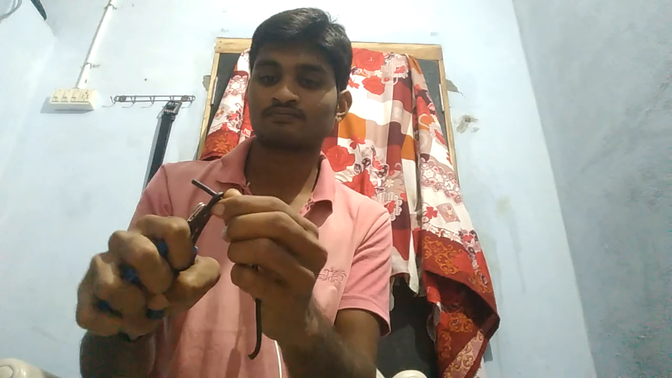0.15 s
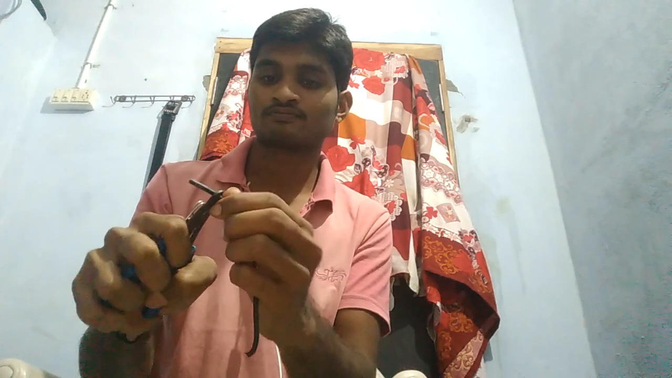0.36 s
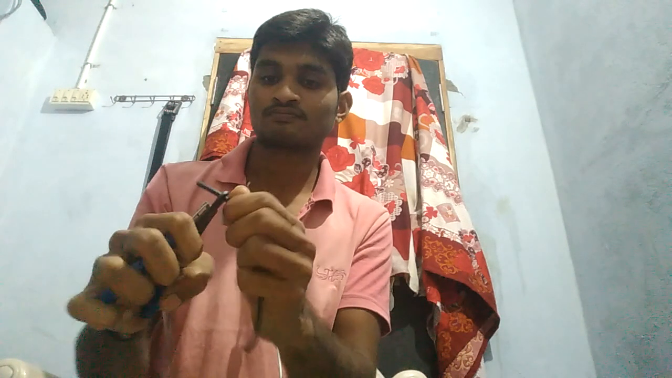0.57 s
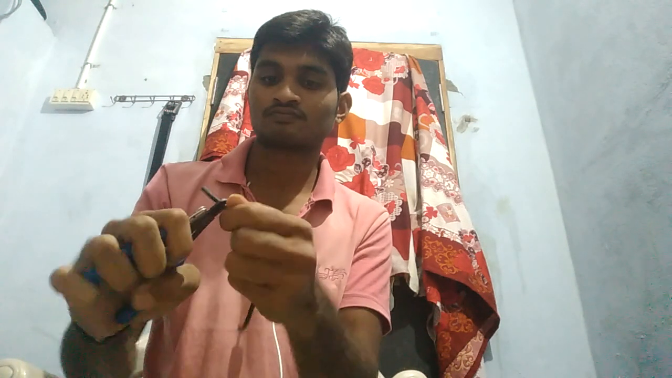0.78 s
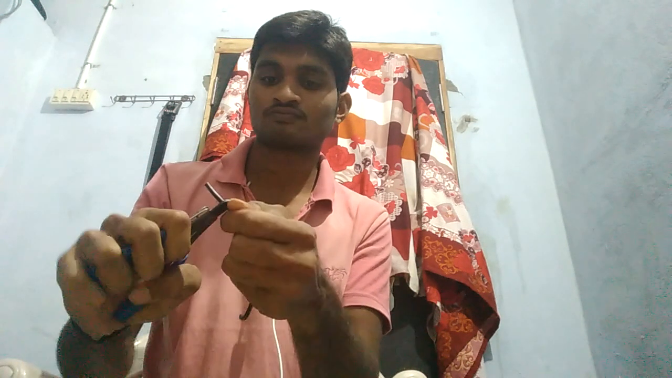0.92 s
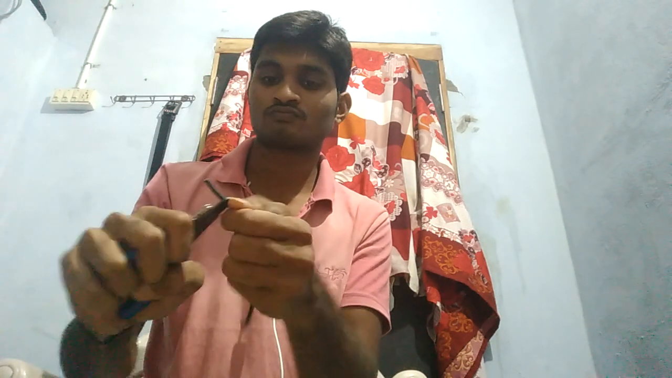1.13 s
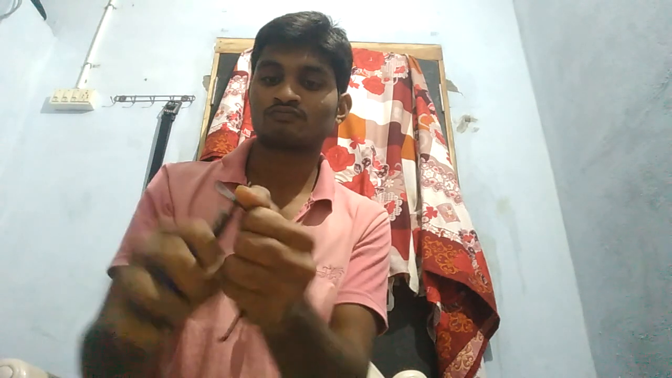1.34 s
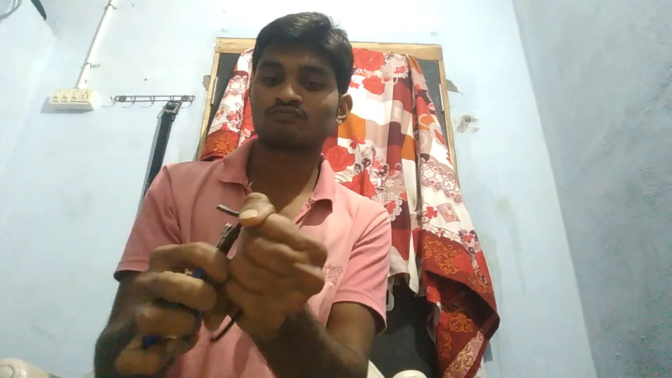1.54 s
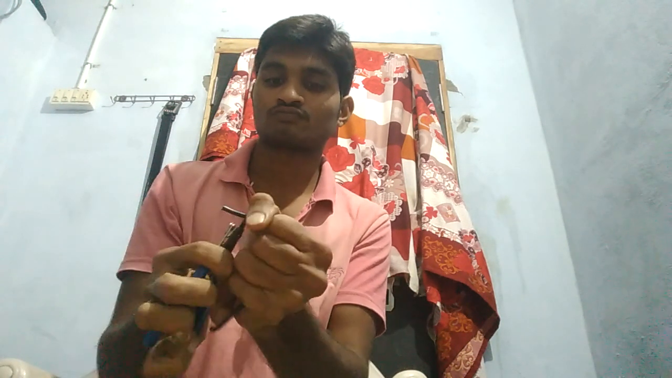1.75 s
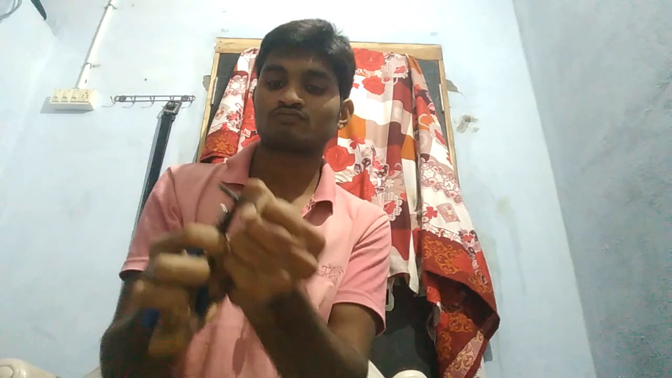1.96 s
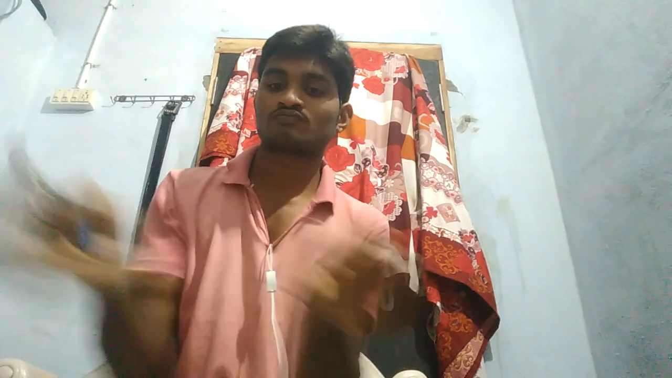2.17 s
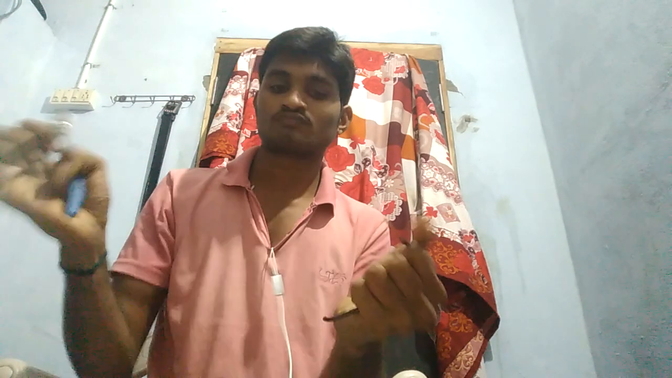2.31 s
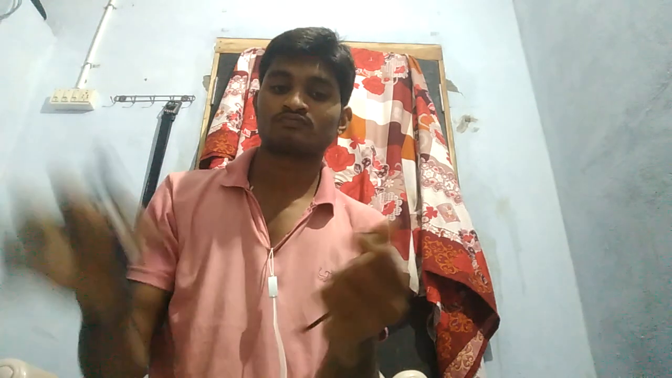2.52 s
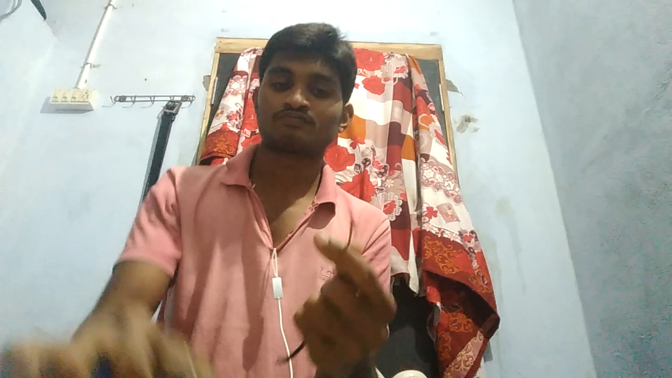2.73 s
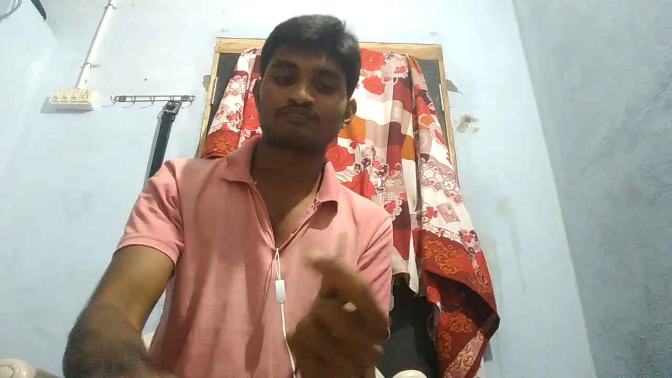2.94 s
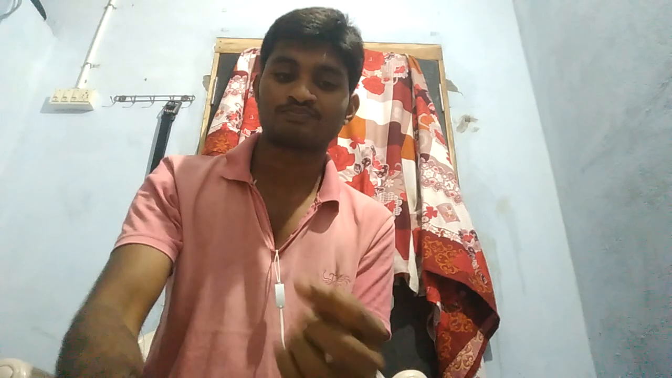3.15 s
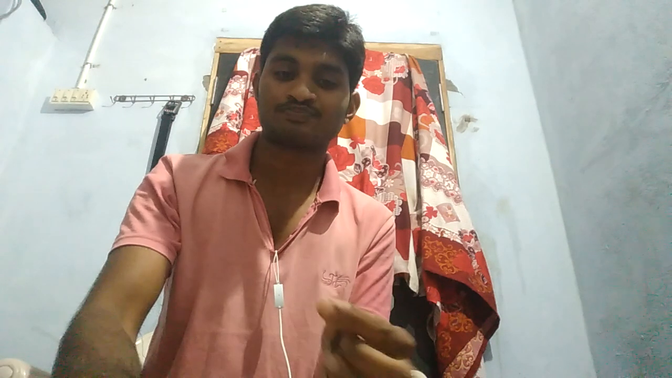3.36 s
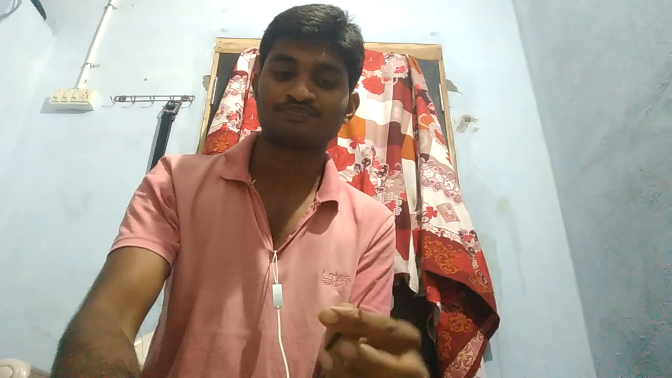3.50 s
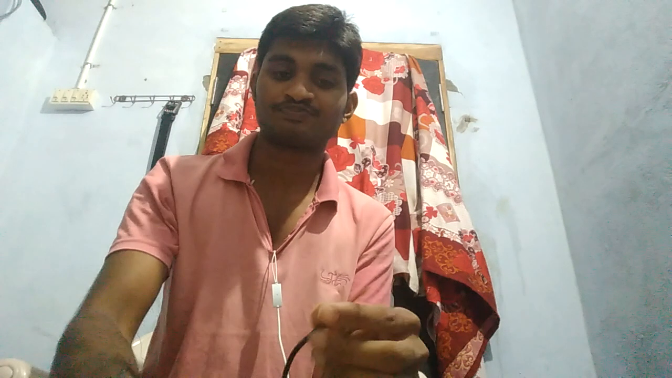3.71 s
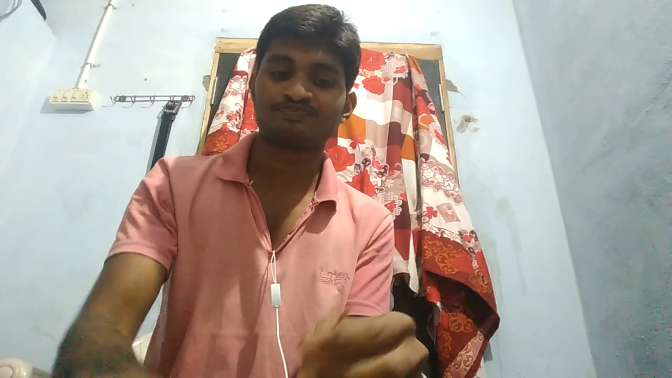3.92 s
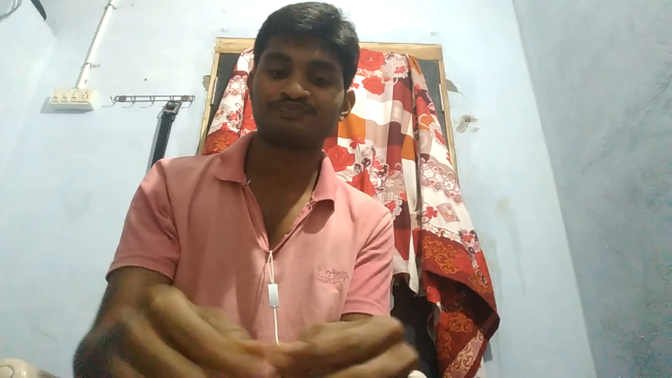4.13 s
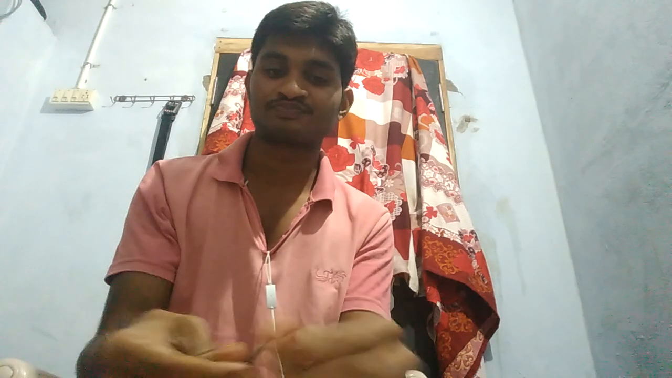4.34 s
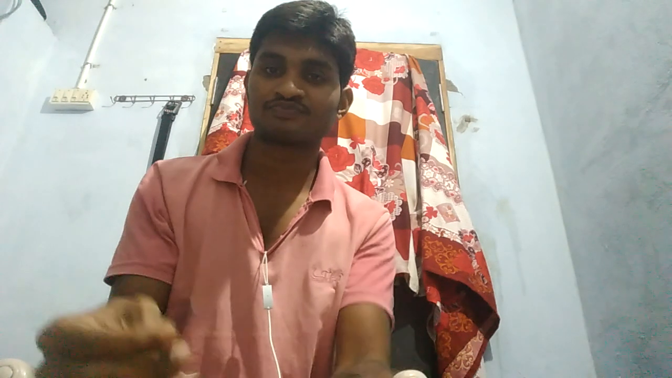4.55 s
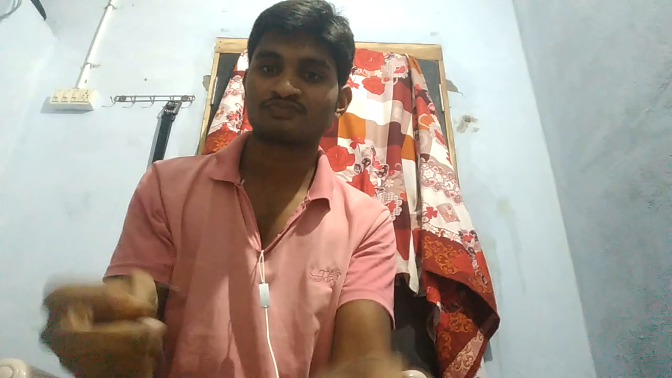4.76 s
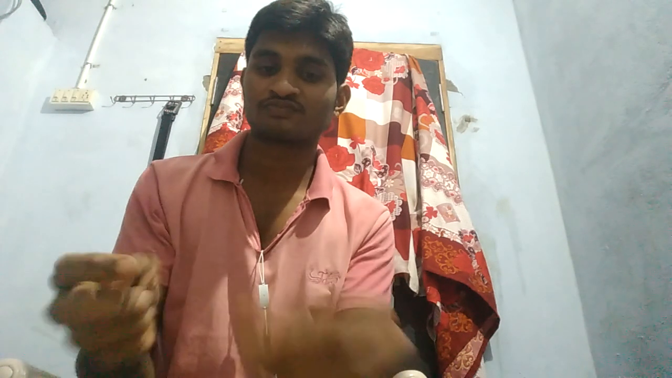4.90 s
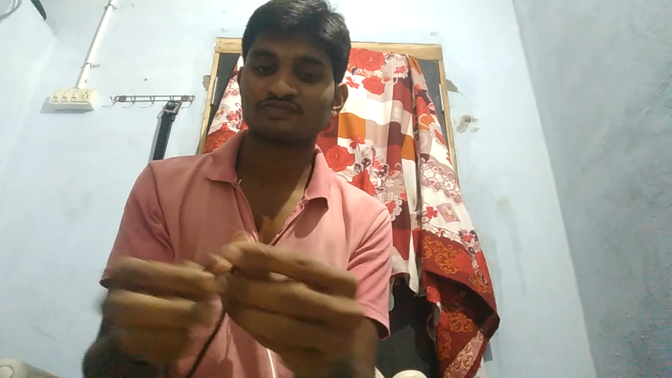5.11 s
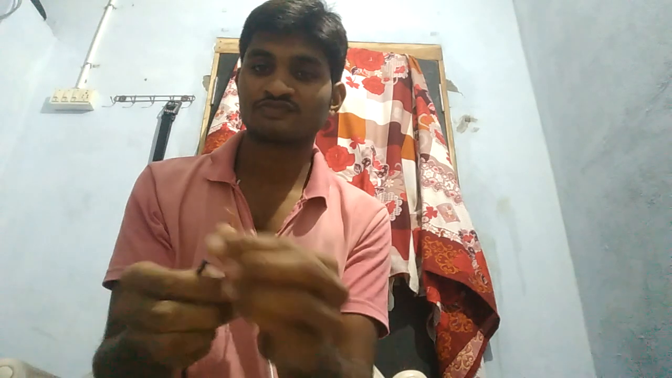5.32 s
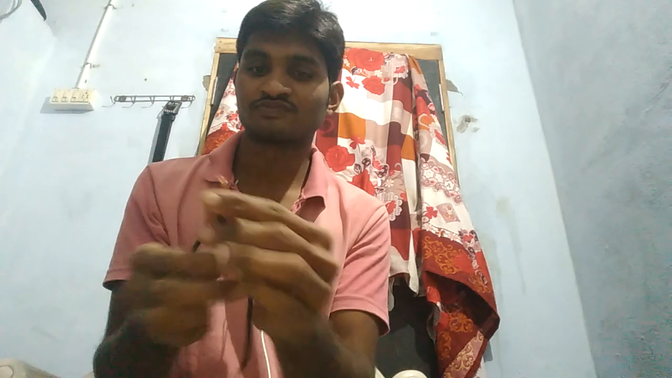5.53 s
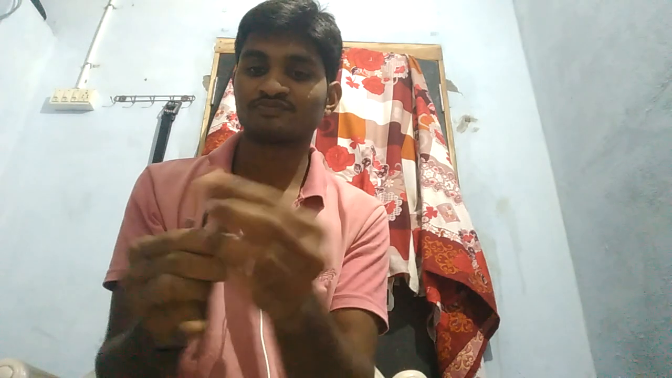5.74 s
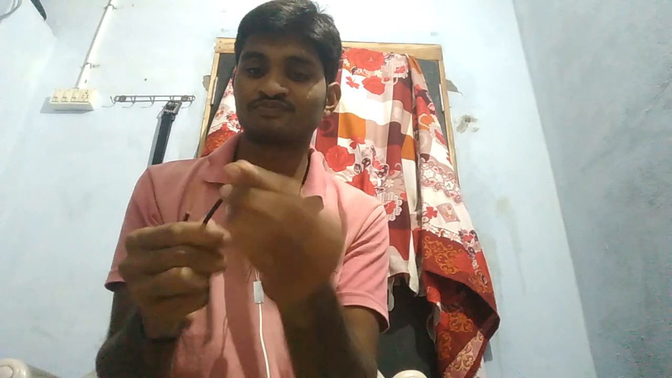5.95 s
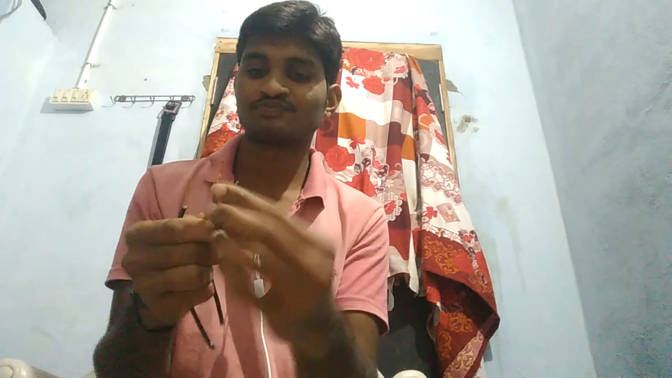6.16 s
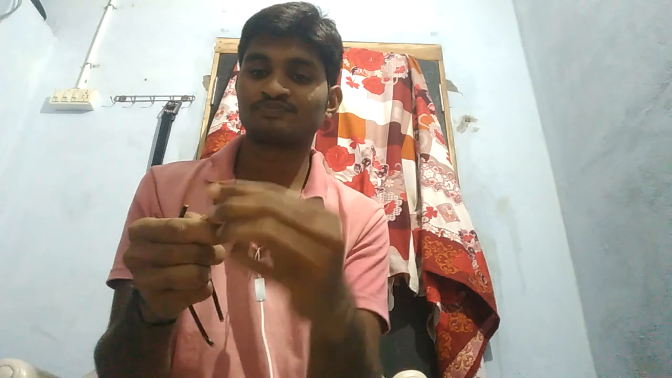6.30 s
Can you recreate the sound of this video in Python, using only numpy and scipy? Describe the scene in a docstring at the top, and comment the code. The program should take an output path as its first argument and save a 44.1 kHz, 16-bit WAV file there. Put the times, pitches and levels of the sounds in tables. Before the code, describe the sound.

Faint creaks and a small snap of wire stripping, then pliers clatter onto a tabletop and a wire scrapes off it.

```python
"""Pliers stripping a wire

Pliers nip the insulation, creaking at the pivot, and tear it off with a snap. They clack shut and
are laid on a table near the microphones, which thuds; a wire is dragged off it and fingered.
A small bare room, two spaced microphones with a treble peak and their own hiss."""
import sys
import numpy as np
from scipy import signal
from scipy.fft import rfft, irfft, next_fast_len
from scipy.io import wavfile
from scipy.ndimage import uniform_filter1d

SR = 44100
rng = np.random.default_rng(int(sys.argv[2]) if len(sys.argv) > 2 else 0)


def waveform_to_disk(signal):
    """Save audio, clipped to [-1, 1], as 16-bit WAV at the path in sys.argv[1]."""
    frames = np.transpose(np.atleast_2d(signal))
    scaled = np.clip(frames, -1, 1) * 32767
    samples = np.round(scaled).astype(np.int16)
    wavfile.write(sys.argv[1], SR, samples)


N = 285319

# noise colours of the bed: microphones, room hush, low rumble (frequency [Hz], relative level [dB])
HISS_SPECTRUM = [(1500, -13), (2900, -3.5), (4700, -3.5), (9280, -2), (15600, 3.5), (16100, -23.5)]
HUSH_SPECTRUM = [(22, 5), (80, -7.5), (128, 3), (309, 0.5), (672, -4.5), (3000, -13.5), (3900, -40.5)]
RUMBLE_SPECTRUM = [(36, -4.5), (50, 7.5), (70, -12.5), (100, -23.5)]
# the room's tail (frequency [Hz], t60 [s])
ROOM_DECAY = [(200, 0.3), (1000, 0.43), (4000, 0.18), (12000, 0.18)]
# noise colours of the handling: rustle, wire flicks, click treble (frequency [Hz], relative level [dB])
RUSTLE_SPECTRUM = [(4000, -8.5), (6000, -10.5), (8200, -3.5), (11200, 8), (15300, -14.5), (16100, -30.5)]
FLICK_SPECTRUM = [(1760, -33), (3000, -21.5), (6440, -17.5), (8000, -13.5), (11000, 5.5), (14500, -5.5),
                  (16000, -19.5)]
CLICK_SPECTRUM = [(2060, -40), (3500, -33.5), (6360, -7.5), (7880, -2.5), (9690, 5), (15200, -8.5),
                  (16500, -31)]
# what rings: table top, dragged things, steel jaws, plastic sleeve, handles
# (frequency [Hz], relative level [dB], t60 [s])
TABLE_MODES = [(161.3, -8, 0.17), (223.4, 2, 0.055), (286, -1.5, 0.05), (352.7, 0.5, 0.074),
               (406.3, -1, 0.067), (496.3, -2.5, 0.05), (674, 1, 0.018), (729, 2, 0.03), (830, 0.5, 0.024),
               (960, 3.5, 0.021), (1101, -0.5, 0.024), (1370, -11, 0.13), (1426, -23, 0.025)]
GRIT_MODES = [(1380, 2.5, 0.014), (2326, -3, .007), (2810, -4.5, 0.012), (3236, -9.5, 0.01),
              (4880, -5.5, 0.0028), (8250, 6, 0.0026)]
JAW_MODES = [(1834, -3, 0.023), (3100, -15, 0.044), (4480, -11.5, 0.032), (6270, 7.5, 0.023),
             (8880, 4.5, 0.013), (10950, 20.5, 0.0031)]
SLEEVE_MODES = [(563, 4, 0.012), (2090, 6.5, 0.0098), (2800, -17, 0.013), (4430, -5, 0.0073)]
HANDLE_MODES = [(2120, -9.5, 0.011), (4120, -6.5, 0.019), (6130, -6, 0.0074), (8300, 7.5, 0.0073),
                (11340, 6.5, 0.0036), (12000, 2, 0.0028), (14200, 0, 0.0076)]
# fader curve of fingers, cloth and wire (time [s], level [dB])
RUSTLE_CURVE = [(2.19, -58), (2.3, -56), (2.5, -61), (2.64, -59.5), (2.76, -66), (3.08, -61), (3.17, -40),
                (3.24, -51), (3.4, -59), (3.75, -53), (3.9, -49), (4.1, -60), (4.3, -69), (4.6, -49.5),
                (4.68, -36), (4.885, -47), (4.905, -68), (5.9, -59.5), (6.47, -71)]
# drags over the table top
# (touch [s], fastest [s], lift [s], rumble [dB], grit [dB], rumble rise [dB/s], rumble fall [dB/s])
TABLE_SLIDES = [(3.103, 3.171, 3.16, -38, -46, 152, 286), (3.369, 3.365, 5.2, -42, -37, 208, 76),
                (3.6, 3.865, 3.8, -38.5, -42, 80, 69), (4.639, 4.649, 4.76, -30.5, -45, 103, 28),
                (4.7, 4.776, 4.86, -36, -26.5, 203, 141)]
# knocks on the table (time [s], lower-mode drive [dB], upper-mode drive [dB])
TABLE_KNOCKS = [(2.2215, -58, -46), (3.1, -33.5, -42.5), (3.107, -32, -49), (3.168, -33.5, -35.5),
                (3.251, -18, -35), (3.255, -9.5, -20.5), (3.5885, -35.5, -23.5), (3.595, -25.5, -40),
                (3.824, -43, -60.5), (3.835, -31.5, -45), (3.873, -35, -55), (3.958, -13, -18),
                (3.972, -46, -16.5), (3.984, -11.5, -23.5), (4.008, -14.5, -23.5), (4.148, -30.5, -41),
                (4.221, -32.5, -52), (4.627, -34.5, -29), (4.64, -18.5, -40), (4.683, -28, -31.5),
                (4.756, -51, -52)]
# wire ends against fingers (time [s], level [dB])
WIRE_FLICKS = [(2.19, -42), (3.7456, -28), (4.872, -32), (5.281, -39), (5.769, -41), (5.775, -36.5),
               (5.842, -45), (5.854, -26), (5.862, -44), (6.0781, -40), (6.102, -31), (6.109, -31),
               (6.115, -41.5)]
# hard contacts of steel, plastic and wire (time [s], treble [dB], mids [dB])
HARD_CLICKS = [(1.7388, -43.5, -46), (1.983, -46, -54), (2.219, -23, -44), (2.222, -23, -39),
               (2.2255, -38, -36), (2.2303, -14.5, -30.5), (2.235, -18.5, -35), (3.0999, -30.5, -43.5),
               (3.2508, -4.5, -9.5), (3.2655, -22.5, -48), (3.3662, -4, -14.5), (3.377, -28, -26),
               (3.3945, -27, -27), (3.3985, -22, -32), (3.4108, -13, -23), (3.4155, -13, -31),
               (3.424, -40, -49), (3.4463, -1, -17.5), (3.588, -28, -33), (3.9566, -1.5, -15),
               (3.9756, -29.5, -13.5), (3.982, -7.5, -27.5), (3.9973, -30.5, -24.5), (4.6278, -20, -35),
               (4.6321, -11, -27), (4.6398, -15, -27.5), (4.6825, -40, -26.5), (4.7565, -19, -22),
               (4.7616, -22, -28), (5.3618, -39.5, -40.5)]
# the jaws shut and bounce (time [s], drive [dB])
JAW_CLACKS = [(2.795, -30), (2.823, -43)]
# squeezes, each a run of slips (start [s], longest run [s], slip gap [s], drive [dB], fade [dB/s])
PIVOT_CREAKS = [(0.012, .22, 0.021, -66.5, -8), (0.639, .012, 0.0045, -61, 202),
                (0.929, 0.085, 0.0076, -61, 60), (1.391, .05, 0.0049, -55.5, 321)]

HISS_DB, HUSH_DB, RUMBLE_DB = -63.5, -68.5, -75.5   # the bed at the start
TOUCH_DB_PER_S, LIFT_DB_PER_S = 1996, 400   # how fast a slide sets in and dies off
GRIT_STEEPNESS = 1.9   # grit follows the speed more steeply than rumble
LOWER_HZ, UPPER_HZ = 228, 730   # a knock crossfades from its lower to its upper drive
TABLE_TOP_HZ = 1430   # padded contacts roll off here
ROCK_FIRST_S, ROCK_GAP_S, ROCK_GAP_RATIO, ROCK_LOSS_DB = 4.081, .092, .73, 4.5
CLICK_T60_S, BURST_ATTACK_S = 0.0082, 0.00043
SLIP_JITTER, BREAK_FREE_DB = 0.091, 8.5   # timing scatter as a share of the gap; accent on the first slip
SNAP_S, SNAP_DB = 1.739, -47.5


def from_db(db):
    """Decibels to gain."""
    return 10 ** (np.asarray(db) / 20)


def rms_one(x):
    """Scale to rms 1."""
    return x / np.sqrt(np.mean(x ** 2) + 1e-20)


def ramp(start_s, length_s):
    """A straight fade from 0 to 1."""
    return np.clip((np.arange(N) / SR - start_s) / length_s, 0, 1)


def at_hz(points, hz):
    """Read a curve on a log-frequency axis."""
    knots_hz, values = np.transpose(points)
    return np.interp(np.log(hz + 1), np.log(knots_hz), values)


def stereo_noise(alike, grain_db=0):
    """Two white noises with a shared part; grain_db roughens them into crackle."""
    noise = rng.standard_normal((3, N))
    shared, left, right = noise * from_db(grain_db * np.minimum(rng.exponential(1, N), 5))
    return np.sqrt(alike) * shared + np.sqrt(1 - alike) * np.array([left, right])


def coloured(x, spectrum):
    """EQ noise to a spectrum, with steep skirts outside it; rms 1."""
    size = next_fast_len(N)
    hz = np.arange(size // 2 + 1) * SR / size
    skirts = np.minimum(1, (hz / spectrum[0][0]) ** 4) / np.maximum(1, (hz / spectrum[-1][0]) ** 4)
    return rms_one(irfft(rfft(x, size) * from_db(at_hz(spectrum, hz)) * skirts, size)[:, :N])


def flicker(rate_hz, depth_db):
    """A randomly wandering gain."""
    r = np.exp(-2 * np.pi * rate_hz / SR)
    slow = signal.lfilter([1], [1, -2 * r, r * r], rng.standard_normal(N + SR))[SR:]
    return from_db(depth_db * rms_one(slow))


def ring(x, hz, t60, small=False):
    """One ringing mode; a small body sends out little below it."""
    r, w = 1000 ** (-1 / (t60 * SR)), 2 * np.pi * hz / SR
    zeros = [.5, 0, -.5] if small else [0, np.sin(w)]
    return signal.lfilter(zeros, [1, -2 * r * np.cos(w), r * r], x + 1e-18)


def strike(seconds, drive_db, modes, left_db, chatter_db, chatter_t60, small=True):
    """Taps with a dying chatter ring a body; drive_db has a row per tap, one value or one per mode."""
    at, out = np.round(seconds * SR).astype(int), np.zeros((2, N))
    # scatter: a shared part and one for each side
    scatter_db = rng.standard_normal((len(at), len(modes), 3)) @ [[1.5, 1.5], [1.2, 0], [0, 1.2]]
    drive_db = np.broadcast_to(drive_db, (len(at), len(modes)))
    pan_db = [[left_db / 2], [-left_db / 2]]
    chatter = from_db(chatter_db) * stereo_noise(0.27)
    fade = 1000 ** (-1 / (chatter_t60 * SR))
    for k, (hz, mode_db, t60) in enumerate(modes):
        blows = np.zeros((2, N))
        blows[:, at] = from_db(drive_db[:, k] + mode_db + scatter_db[:, k].T + pan_db)
        blows += chatter * signal.lfilter([1], [1, -fade], blows + 1e-18)
        blows[1] *= -1 if k % 4 == 3 else 1   # some modes move the microphones in opposite ways
        out += ring(blows, hz, t60, small)
    return out


def bursts(seconds, levels_db, noise, t60):
    """Gate noise with a sharp attack and a quick decay, levelled so that no burst falls in a lull."""
    gate, age = np.zeros(N), np.arange(SR // 20) / SR
    envelope = np.minimum(age / BURST_ATTACK_S, 1) * 1000 ** (-age / t60)
    for s, level_db in zip(seconds, levels_db):
        at = round(s * SR)
        gate[at:at + len(age)] += from_db(level_db) * envelope
    local_power = uniform_filter1d(np.mean(noise ** 2, axis=0), size=101) / np.mean(noise ** 2)
    return gate * noise / np.sqrt(local_power + .01)


def background():
    """Microphone hiss, room hush and low rumble; the whole bed steps up once, the rumble swells late."""
    hiss = from_db(HISS_DB) * coloured(stereo_noise(0), HISS_SPECTRUM) * flicker(14, 0.494)
    hush = from_db(HUSH_DB) * coloured(stereo_noise(0.097), HUSH_SPECTRUM)
    step_db, swell_db = 8 * ramp(2.173, 0.037), 6.5 * ramp(5.25, 0.085)
    rumble = from_db(RUMBLE_DB + swell_db) * coloured(stereo_noise(1), RUMBLE_SPECTRUM)
    return from_db(step_db) * (hiss + hush + rumble)


def room(send, predelay_s=0.001):
    """A short diffuse tail: octave bands of noise, each dying at its own rate."""
    age, tail = np.arange(SR // 2) / SR, 0
    for low_hz in 62.5 * 2 ** np.arange(8):
        band = signal.butter(2, [low_hz, 2 * low_hz], "band", fs=SR, output="sos")
        fade = 1000 ** (-age / at_hz(ROOM_DECAY, 1.4 * low_hz))
        tail = tail + fade * signal.sosfilt(band, rng.standard_normal((2, len(age))))
    return signal.fftconvolve(send, tail * (age > predelay_s), axes=1)[:, :N]


def rustle():
    """Fingers, cloth and wire brush together: airy, grainy, a little to the right."""
    level_db = np.interp(np.arange(N) / SR, *np.transpose(RUSTLE_CURVE), left=-200, right=-200)
    texture = coloured(stereo_noise(0, grain_db=3.5), RUSTLE_SPECTRUM) * from_db([[-2.5], [2.5]])
    return from_db(level_db) * texture * flicker(30, 3.8)


def slide_levels():
    """Rumble and grit in dB: slides swell with speed and die off as they slow or lift."""
    t, rumbles_db, grits_db = np.arange(N) / SR, [], []
    for touch, fastest, lift, rumble_db, grit_db, rise, fall in TABLE_SLIDES:
        drop_db = np.maximum(rise * (fastest - t), fall * (t - fastest))
        drop_db += TOUCH_DB_PER_S * np.maximum(touch - t, 0) + LIFT_DB_PER_S * np.maximum(t - lift, 0)
        rumbles_db.append(rumble_db - drop_db)
        grits_db.append(grit_db - GRIT_STEEPNESS * drop_db)
    return np.max(rumbles_db, axis=0), np.max(grits_db, axis=0)


def slides():
    """Friction grains draw a rumble from the table and a gritty scrape from what is dragged."""
    rumble_db, grit_db = slide_levels()
    fine = stereo_noise(0.18, grain_db=2.5)
    rumble = rms_one(sum(from_db(db) * ring(fine, hz, .5 * t60) for hz, db, t60 in TABLE_MODES))
    coarse = stereo_noise(0.37, grain_db=5.5)
    grit = rms_one(sum(from_db(db) * ring(coarse, hz, t60) for hz, db, t60 in GRIT_MODES))
    return from_db(rumble_db) * rumble * flicker(32, 0.48) + from_db(grit_db) * grit * flicker(60, 2.6)


def rocking(first_db):
    """Rocking to rest: four landings, ever closer and softer (time [s], level [dB], level [dB])."""
    k = np.arange(4)
    s = ROCK_FIRST_S + ROCK_GAP_S * (1 - ROCK_GAP_RATIO ** k) / (1 - ROCK_GAP_RATIO)
    return np.column_stack([s, np.add.outer(-ROCK_LOSS_DB * k, first_db)])


def table_thuds():
    """Knocks travel through the table top; a harder contact reaches the upper modes."""
    s, lower_db, upper_db = np.vstack([TABLE_KNOCKS, rocking(first_db=(-25, -28))]).T
    mode_hz = np.array(TABLE_MODES)[:, 0]
    blend = np.clip(np.log(mode_hz / LOWER_HZ) / np.log(UPPER_HZ / LOWER_HZ), 0, 1)
    drive_db = np.outer(lower_db, 1 - blend) + np.outer(upper_db, blend)
    knocks = strike(s, drive_db, TABLE_MODES, left_db=1.1, chatter_db=-25.5, chatter_t60=0.095,
                    small=False)
    band = signal.butter(3, [135, TABLE_TOP_HZ], "band", fs=SR, output="sos")
    knocks = signal.sosfilt(band, knocks)   # the knocks keep nothing below about 135 Hz
    shaking = signal.lfilter([.001], [1, -.9995], np.abs(knocks).mean(axis=0))   # the legs rock on
    low_end = coloured(stereo_noise(0.97), [(35, -11), (100, 4.5)])
    return knocks + from_db(-21.5) * shaking * low_end


def wire_flicks():
    """Stiff wire ends flick against fingers: thin, bright crackles."""
    s, level_db = np.transpose(WIRE_FLICKS)
    crackle = coloured(stereo_noise(0, grain_db=6), FLICK_SPECTRUM) * from_db([[-2.5], [2.5]])
    return bursts(s, level_db, crackle, t60=0.017)


def clicks():
    """Hard contacts: a bright crack layered over duller, longer mids."""
    s, treble_db, mids_db = np.vstack([HARD_CLICKS, rocking(first_db=(-35, -31.5))]).T
    crack = coloured(stereo_noise(0.36), CLICK_SPECTRUM) * from_db([[-1.5], [1.5]])
    mids = coloured(stereo_noise(0.27), [(500, 3), (1700, -5), (2800, -0.5), (3700, -8), (5600, -7.5)])
    return bursts(s, treble_db, crack, CLICK_T60_S) + bursts(s, mids_db, mids, 2.43 * CLICK_T60_S)


def jaw_clack():
    """Steel shuts on steel, rings and chatters."""
    s, drive_db = np.transpose(JAW_CLACKS)
    return strike(s, drive_db[:, None], JAW_MODES, left_db=-6.5, chatter_db=-28.5, chatter_t60=0.097)


def pivot_creak():
    """Stick-slip in the joint: each slip gives a dry tick and rings the short modes of the handles."""
    slips, k = [], np.arange(16)
    for start, length, gap, slip_db, fade_db_per_s in PIVOT_CREAKS:
        uneven = rng.standard_normal(len(k)) * (k > 0)
        age = gap * (k + SLIP_JITTER * uneven)
        level_db = slip_db + BREAK_FREE_DB * (k == 0) - fade_db_per_s * age
        slips += zip(start + age, np.where(age > length, -200, level_db))
    s, drive_db = np.transpose(slips)
    tick_noise = coloured(stereo_noise(0.22), [(1000, -8), (4000, -6), (15000, -18)])
    ticks = bursts(s, drive_db + 4.5, tick_noise, t60=0.009)
    handles = strike(s, drive_db[:, None], HANDLE_MODES, left_db=-4.5, chatter_db=-10.5,
                     chatter_t60=0.014)
    return ticks + handles


def sleeve_snap():
    """The plastic insulation parts with a small dry snap and rings for a moment."""
    return strike(np.array([SNAP_S]), SNAP_DB, SLEEVE_MODES, left_db=0, chatter_db=-27, chatter_t60=0.023)


def scene():
    """The mix: airborne contacts get more room send than the thuds; slides and rustle stay dry."""
    airborne = pivot_creak() + jaw_clack() + sleeve_snap() + clicks() + wire_flicks()
    thuds = table_thuds()
    reverb = room(from_db(-34) * airborne + from_db(-40.5) * thuds)
    return airborne + thuds + reverb + slides() + rustle() + background()


def record(dry):
    """Soft-clip the peaks and cut the top, fully closed at 17 kHz."""
    high_cut = signal.cheby2(20, 110, 17000, fs=SR, output="sos")
    return signal.sosfilt(high_cut, 1.1 * np.tanh(dry / 1.1))


dry = scene()
out = record(dry)
waveform_to_disk(out)
```